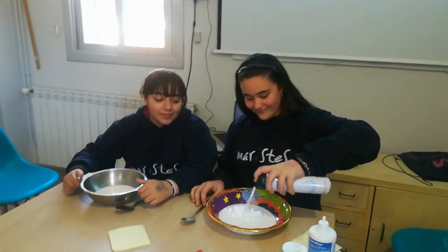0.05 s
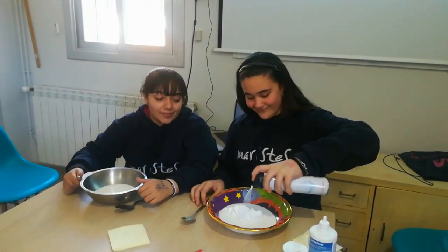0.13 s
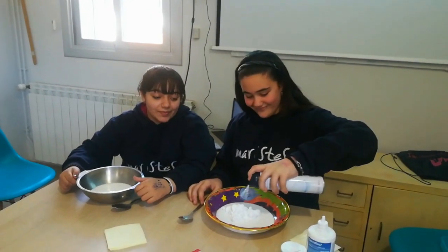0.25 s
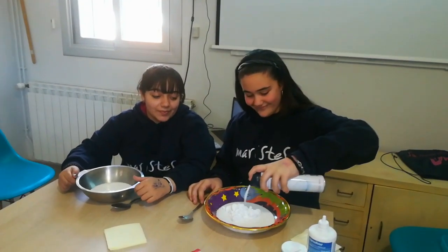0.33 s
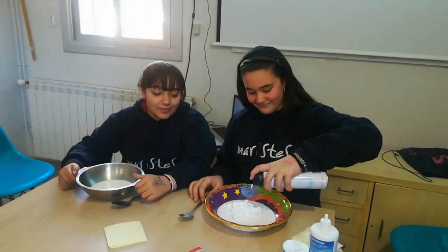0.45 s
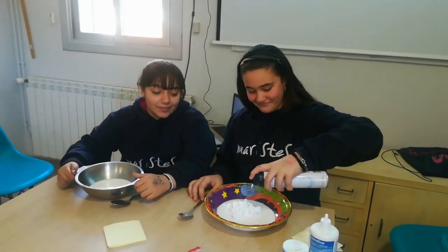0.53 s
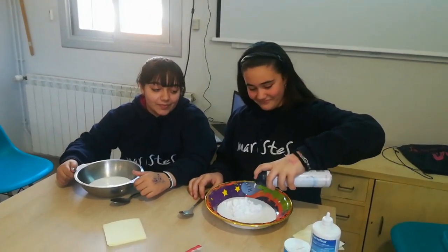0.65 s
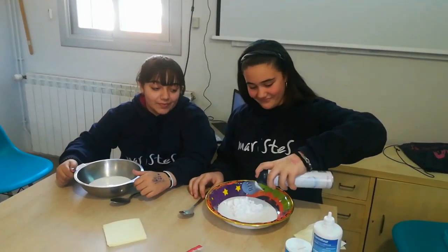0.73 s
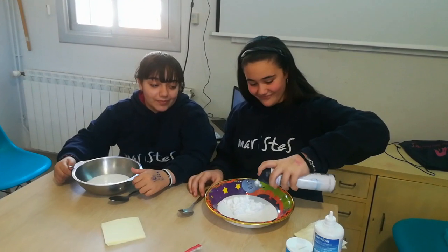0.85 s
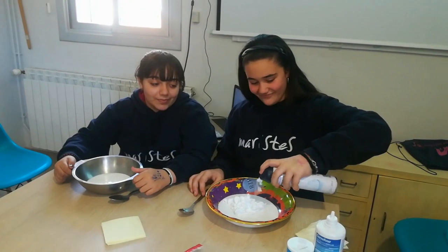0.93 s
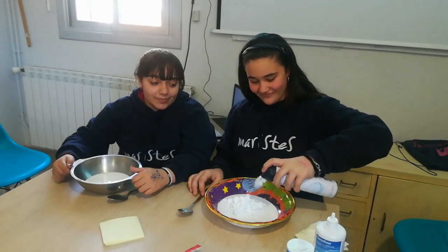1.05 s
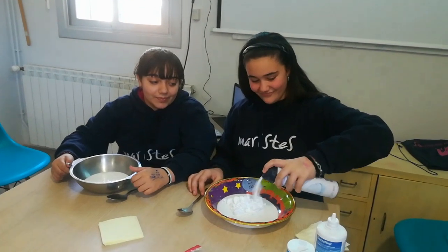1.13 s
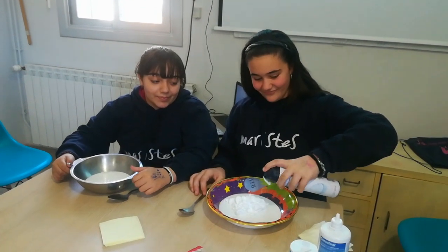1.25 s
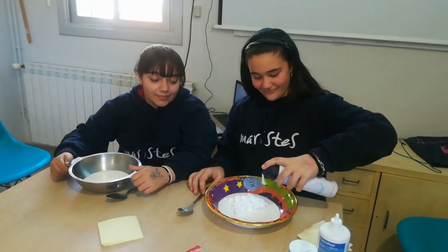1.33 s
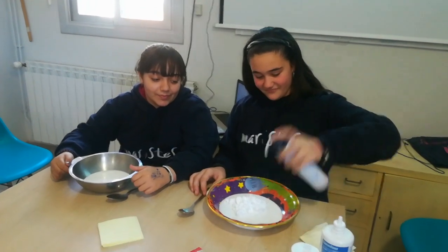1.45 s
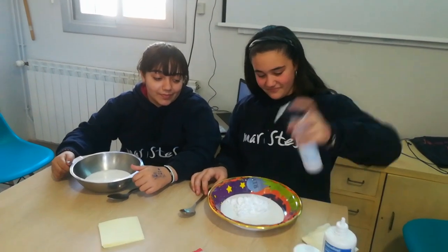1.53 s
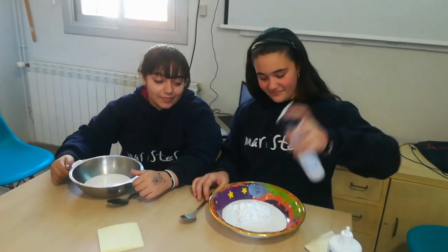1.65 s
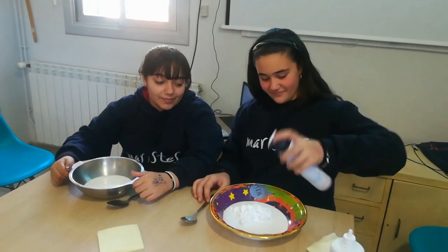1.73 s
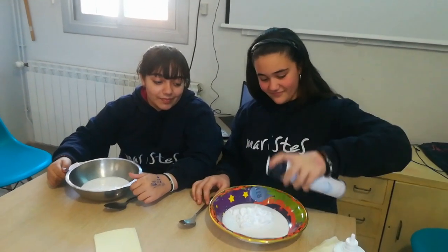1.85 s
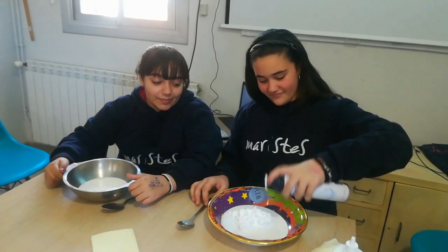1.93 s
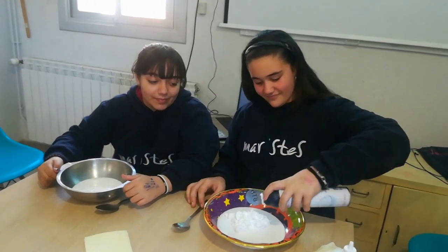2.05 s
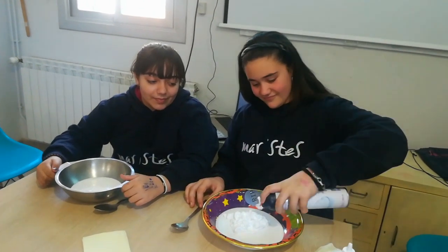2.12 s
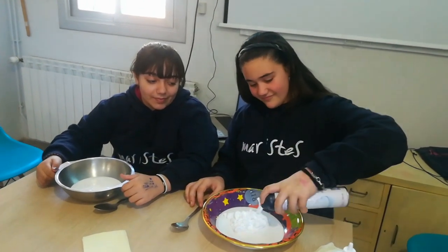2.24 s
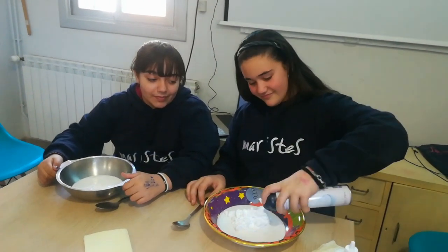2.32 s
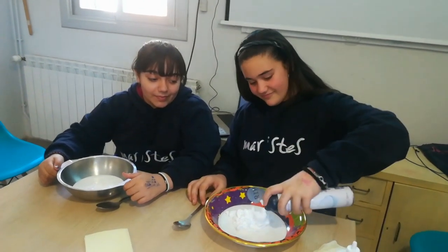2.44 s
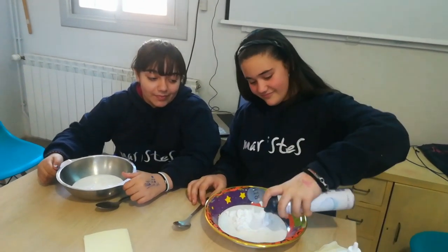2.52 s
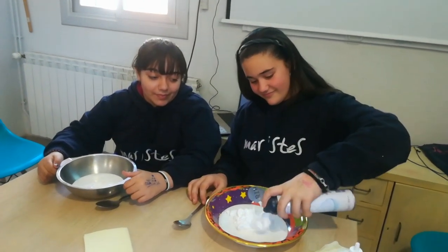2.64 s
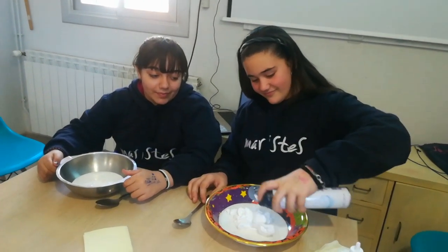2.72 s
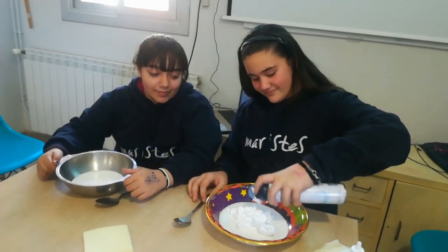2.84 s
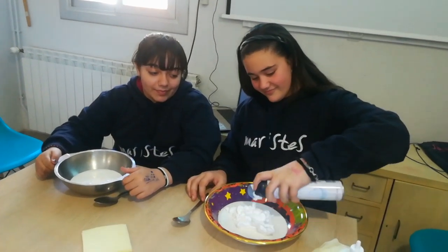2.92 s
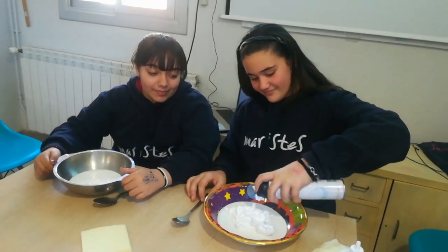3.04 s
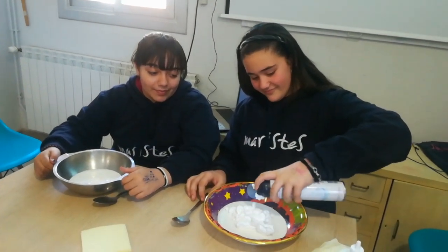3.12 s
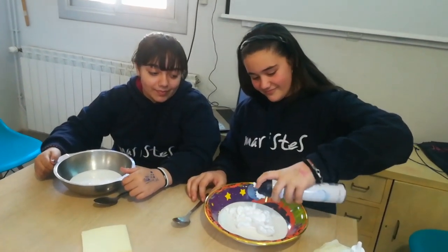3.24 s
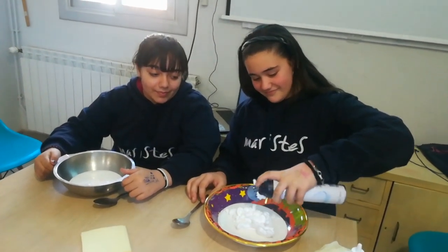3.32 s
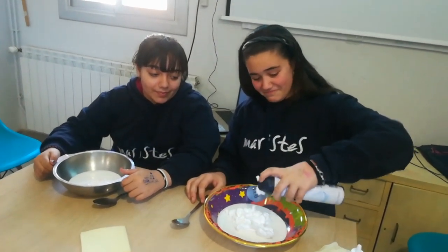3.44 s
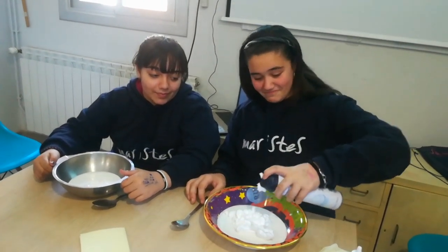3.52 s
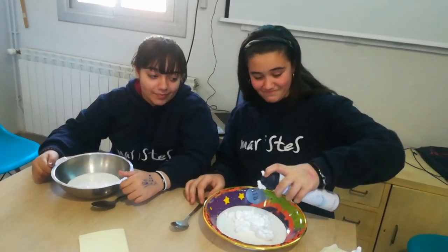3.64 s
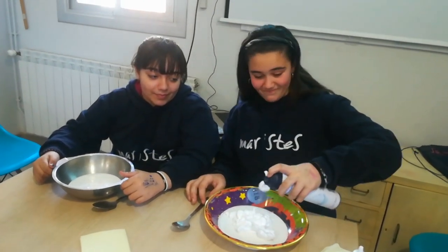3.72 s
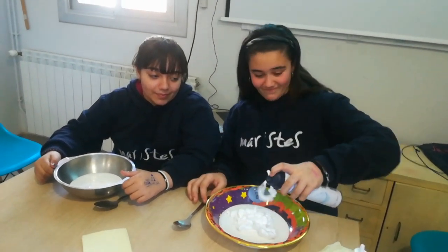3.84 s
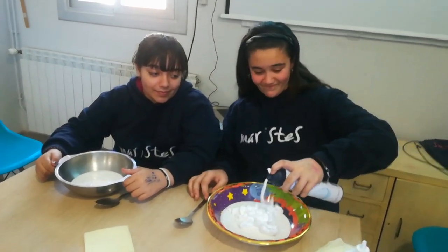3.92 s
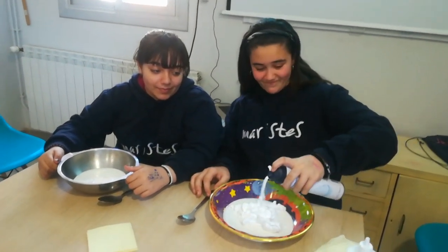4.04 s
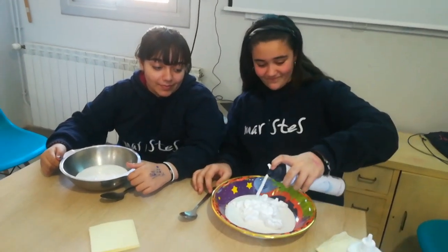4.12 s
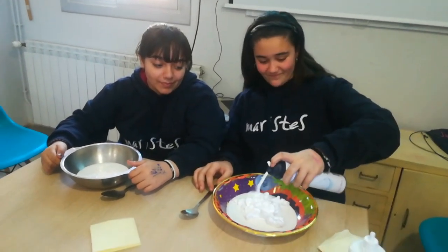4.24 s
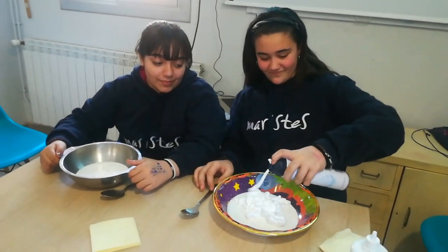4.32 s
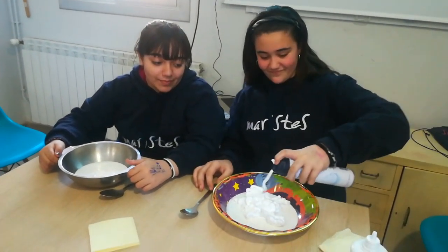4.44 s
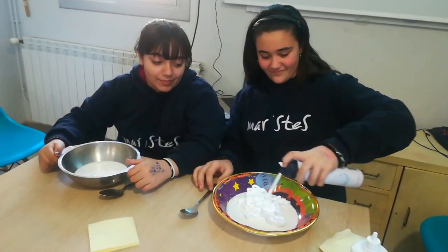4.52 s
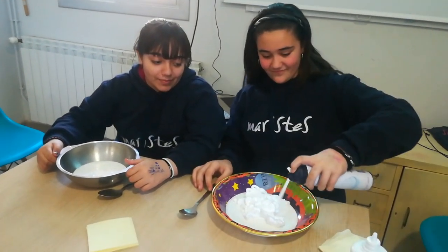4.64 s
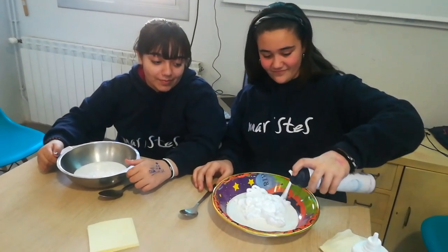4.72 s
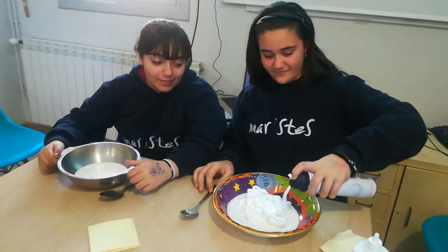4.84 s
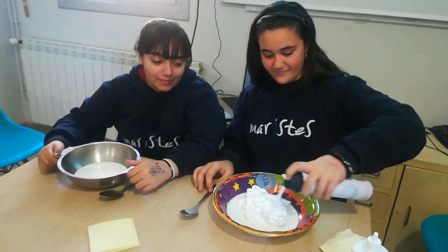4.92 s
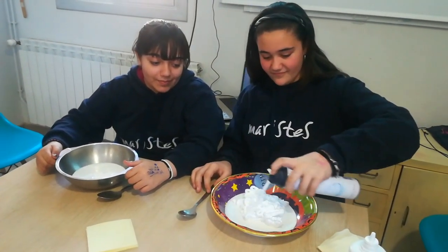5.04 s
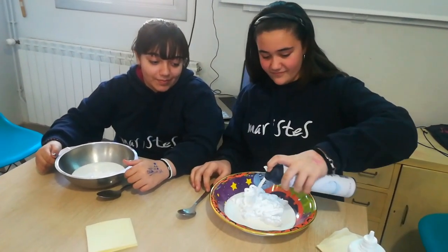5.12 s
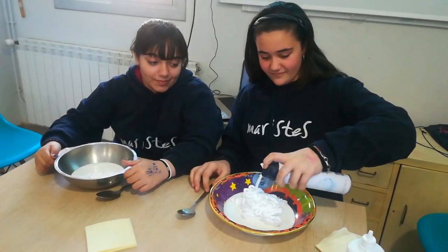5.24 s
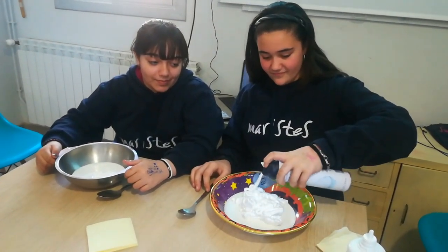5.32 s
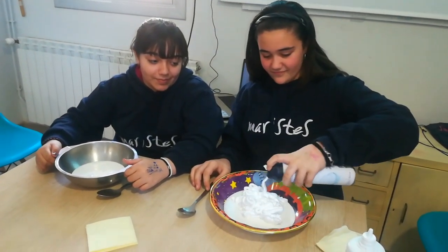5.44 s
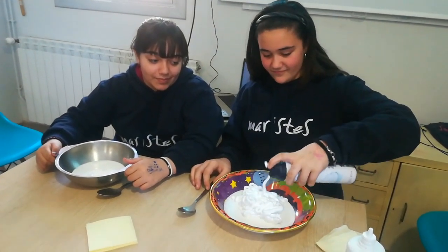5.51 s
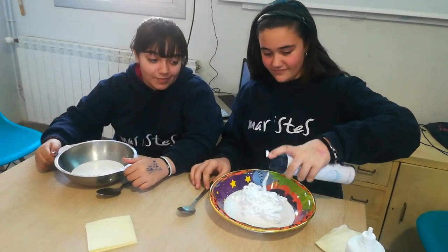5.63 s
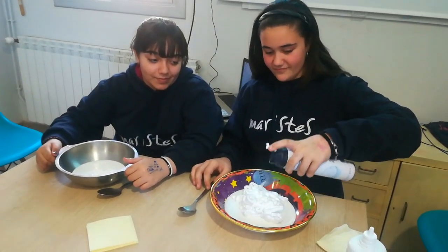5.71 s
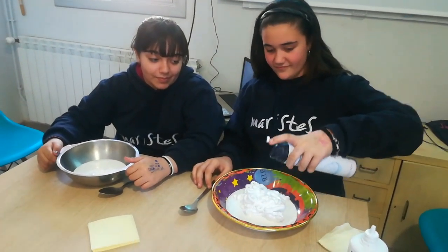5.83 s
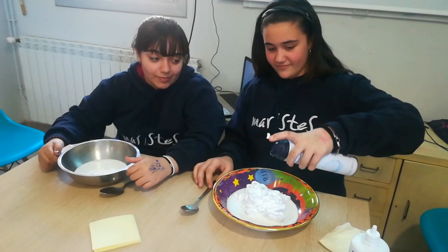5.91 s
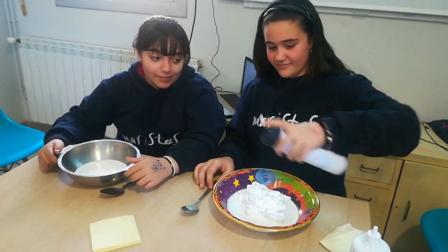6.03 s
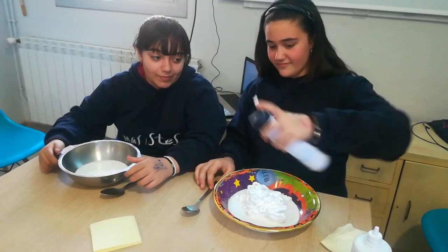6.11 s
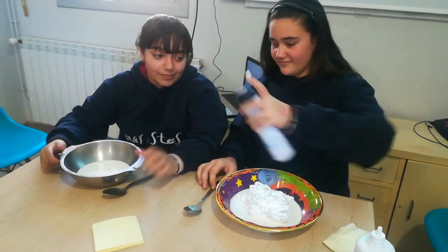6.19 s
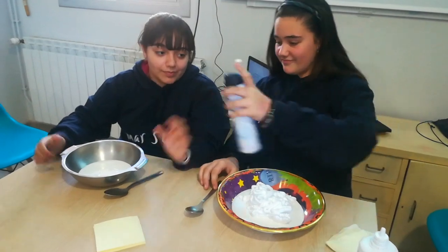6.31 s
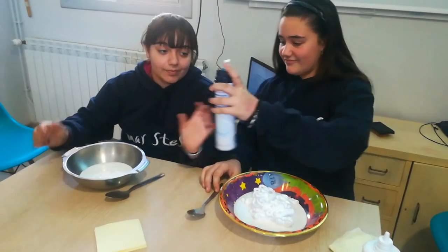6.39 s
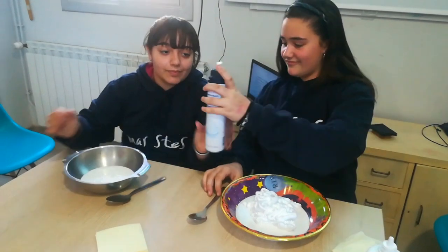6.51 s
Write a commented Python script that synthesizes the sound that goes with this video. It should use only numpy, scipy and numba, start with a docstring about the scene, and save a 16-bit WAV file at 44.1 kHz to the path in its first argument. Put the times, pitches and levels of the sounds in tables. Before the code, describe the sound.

Short spurts of foam hiss and sputter from a spray can in a classroom, followed by a door banging shut.

```python
"""An aerosol can squirts foam onto a plate in short spurts, about a metre away in a hard-walled classroom.
Gas hisses through the nozzle, bubbles burst in the jet and the valve spits; between spurts it only seeps.
A small fan whines and sleeves rustle. Further off, a door knocks and bangs shut."""
import sys
import numpy as np
from scipy import signal
from scipy.fft import rfft, irfft
from scipy.io import wavfile
from scipy.ndimage import uniform_filter1d
from numba import njit

SR = 44100
rng = np.random.default_rng(int(sys.argv[2]) if len(sys.argv) > 2 else 0)


def master_out(mix):
    """Clip the mix to full scale and print it as 16-bit PCM to the path in sys.argv[1]."""
    frames = np.transpose(np.atleast_2d(mix))
    ceiling = np.clip(frames, -1, 1)
    pcm = np.round(ceiling * 32767).astype(np.int16)
    wavfile.write(sys.argv[1], SR, pcm)


N = 289281
TIME = np.arange(N) / SR

# The tone of gas leaving the nozzle: pitch_hz, level_db
JET_TONE = [(500, -27.5), (1000, -15), (1290, -11), (1450, -14.5), (1850, -3), (2350, -7), (3150, 0),
            (4300, -1.5), (5400, -0.5), (6650, 0), (8000, -7), (9100, -10.5), (12000, -17), (15800, -21.5)]


def amp(db):
    """Turn decibels into a number to multiply by."""
    return 10 ** (np.asarray(db) / 20)


def unit(x):
    """Scale a signal to an average power of 1."""
    return x / np.sqrt(np.mean(x ** 2))


def noise():
    """White noise as long as the scene."""
    return rng.standard_normal(N)


def wander(per_s):
    """A smooth random wobble, about 1 in size."""
    step = int(SR / per_s)
    stairs = np.repeat(noise()[:N // step + 1], step)
    return unit(uniform_filter1d(stairs, step)[:N])


def gate(start, stop, rise_s, fall_s):
    """A level that rises at the start and dies away after the stop."""
    return np.clip((TIME - start) / rise_s, 0, 1) * np.exp(-np.maximum(TIME - stop, 0) / fall_s)


def burst(start, length):
    """A quick swell that peaks at half the length, then dies away."""
    age = np.clip(2 * (TIME - start) / length, 0, 60)
    return age * np.exp(1 - age)


def look_up(table, hz):
    """Read a table's value at any pitch, sliding between its rows."""
    pitches, values = np.transpose(table)
    return np.interp(np.log(np.maximum(hz, 1)), np.log(pitches), values)


def colour(x, tone, size=2048):
    """Filter a sound to the tone in a table; white noise keeps its power."""
    cepstrum = irfft(np.log(amp(look_up(tone, np.fft.rfftfreq(size, 1 / SR)))))
    # folding makes the filter ring only after a sound, never before it
    cepstrum[1:size // 2] *= 2
    cepstrum[size // 2 + 1:] = 0
    response = irfft(np.exp(rfft(cepstrum)))
    return signal.oaconvolve(x, response / np.linalg.norm(response))[:N]


@njit
def band_pass(x, tuning, damping):
    """Let through one band of pitches, which may move."""
    out, band, low = np.empty(len(x)), 0., 0.
    for i in range(len(x)):
        g, k = tuning[i], damping[i]
        now = (band + g * (x[i] + 1e-18 - low)) / (1 + g * (g + k))
        band, low, out[i] = 2 * now - band, low + 2 * g * now, k * now
    return out


def resonate(x, hz, width_hz):
    """Make a sound ring around one pitch; white noise keeps about its power."""
    hz = np.clip(hz, 1, SR / 3) * np.ones(len(x))
    return band_pass(x, np.tan(np.pi * hz / SR), width_hz / hz) * np.sqrt(SR / np.pi / width_hz)


def room(x, decay_scale, onset_s):
    """The classroom's echo: long waves reach both ears alike, short ones do not."""
    # Time to fade by 60 dB, before decay_scale multiplies it: pitch_hz, decay_s
    decay_times = [(100, 0.43), (500, 0.49), (2000, 0.62), (4000, 0.51), (8000, 0.38), (15000, 0.37)]
    hz, _, cells = signal.stft(rng.standard_normal((2, SR)), SR, nperseg=256)
    apart = np.pi / 4 * np.minimum(hz / 420, 1)[:, None] ** 1.5
    mid, side = np.cos(apart) * cells[0], np.sin(apart) * cells[1]
    decay_s = decay_scale * look_up(decay_times, hz)[:, None]
    fade = np.exp(-np.log(1000) * np.linspace(0, 1, cells.shape[-1]) / decay_s)
    tail = signal.istft(np.array([mid + side, mid - side]) * fade, SR)[1][:, :SR]
    tail *= 1 - np.exp(-TIME[:SR] / onset_s)
    tail /= np.linalg.norm(tail, axis=1, keepdims=True)
    return signal.fftconvolve(x[None], tail, axes=1)[:, :N]


def valve(dribble_db=-11, sag_db_per_s=21, drying_db_per_s=16, after_db=-15.5, after_db_per_s=67.5):
    """Each press swells, holds and fades to a weakening dribble; gives the curves that steer the can."""
    # Presses of the valve: press_s, shut_s, level_db, swell_s, swell_db, hold_s, fade_db_per_s,
    # splatter_db, whistle_db, top_hz, arch_octaves
    presses = [(0.0, 0.261, -27.5, 0.001, -10, 0.034, 190, -18, -12, 6000, 0.074),
               (0.266, 0.426, -27, 0.065, 0.5, 0.059, 265, -19, -5, 6230, 0.23),
               (0.731, 1.167, -26.5, 0.098, 6.5, 0.057, 49.5, -19, 0, 6280, 0.03),
               (2.591, 3.112, -28.5, 0.013, 2, 0.46, 80.5, -12.5, -4, 6400, 0.89),
               (3.62, 3.648, -52.5, 0.003, 1, 0.02, 55.5, -22, 4, 3440, 0.058),
               (3.644, 4.08, -28.5, 0.061, 11, 0.025, 297.5, -17.5, 0, 4820, 0.055)]
    clearest = 0.66  # how far through a spurt the nozzle is least clogged
    choke_db, choke_octaves = -7.5, 0.88  # in a dribble, foam damps and lowers the whistle
    flow, dribble, after_hiss = np.zeros((3, N))
    tone = np.zeros((3, N))
    for press, shut, db, swell, swell_db, hold, fade, splatter_db, whistle_db, top_hz, arch in presses:
        age = np.clip(TIME - press, 0, shut - press)
        eased_s = np.maximum(age - swell - hold, 0)
        fall_db = np.maximum(-fade * eased_s, dribble_db - sag_db_per_s * eased_s)
        strength = amp(db - swell_db * np.maximum(1 - age / swell, 0) + fall_db)
        choked = np.minimum(fall_db / dribble_db, 1) ** 2
        jet = strength * gate(press, shut, rise_s=0.00067, fall_s=0.01)
        flow += jet
        dribble += jet * choked
        shut_for_s = np.maximum(TIME - shut, 0)
        after_hiss += strength * (TIME > shut) * amp(after_db - after_db_per_s * shut_for_s)
        # the whistle rises as the nozzle clears and sinks as foam fills it
        clogged = np.cos(np.pi / 2 * age / (shut - press) / clearest) ** 2
        hz = top_hz * 2 ** (-arch * clogged - choke_octaves * choked)
        # weak flow is wetter; a spurt dries as it runs
        wet_db = splatter_db - 0.7828 * fall_db - drying_db_per_s * age
        tone = np.where(TIME >= press, [wet_db, whistle_db + choke_db * choked, hz], tone)
    return flow, dribble, after_hiss, *tone


def bubbles(per_s, spread_db, pop_s):
    """Bubbles of uneven size burst at random, each with a tiny puff of gas."""
    sizes = amp(spread_db * np.minimum(rng.exponential(size=N), 4))
    pops = (rng.random(N) < per_s / SR) * sizes
    fading_power = signal.lfilter([1], [1, -np.exp(-2 / (pop_s * SR))], pops ** 2)
    return unit(noise() * np.sqrt(fading_power))


def spray(flow, wet_db, whistle_db, nozzle_hz, flutter_db=0.78):
    """Gas and bursting bubbles rush from the whistling nozzle; wet foam patters on the plate."""
    # The tone of foam landing: pitch_hz, level_db
    splatter_tone = [(60, -11), (140, -9.5), (250, -2), (480, -4.5), (720, 3), (1100, -5), (1450, -5),
                     (2500, -18)]
    flow = flow * amp(1 + flutter_db * wander(90))
    jet = colour(amp(-3) * noise() + amp(-5) * bubbles(per_s=500, spread_db=0.5, pop_s=0.0021), JET_TONE)
    splatter = amp(wet_db - 1) * colour(bubbles(per_s=600, spread_db=-0.5, pop_s=0.0015), splatter_tone)
    share = amp(whistle_db - 1)  # the whistle takes its share of the jet's power
    whistling_jet = (jet + share * whistle(nozzle_hz)) / np.sqrt(1 + share ** 2)
    return flow * (whistling_jet + splatter)


def whistle(hz, waver=0.026):
    """Bursting bubbles keep the nozzle ringing on an unsteady note."""
    hz = hz * (1 + waver * wander(50))
    ring = resonate(bubbles(per_s=1900, spread_db=6.5, pop_s=0.0012), hz, width_hz=480)
    return unit(resonate(ring, hz, width_hz=8200))


def spits(dribble, spit_s=0.0018, sputter_per_s=45, sputter_hz=3810):
    """Each gas pocket gives a puff that rings the nozzle; small ones come at random in a dribble."""
    # The loudest gas pockets: start_s, level_db, pitch_hz
    big_pockets = [(0.043, -30, 5600), (0.095, -23.5, 5860), (0.175, -23, 4840), (0.244, -24.5, 4800),
                   (0.248, -17, 5000), (0.253, -21, 5020), (0.998, -24, 3230), (1.093, -26, 4730),
                   (1.117, -22.5, 6160), (1.148, -27.5, 3300), (2.213, -47, 5100), (3.093, -26.5, 4830),
                   (3.651, -34.5, 4540), (3.749, -20, 3200), (3.771, -22.5, 2830), (3.813, -25, 3300),
                   (3.848, -25.5, 2730), (4.238, -43.5, 4000)]
    small_pockets = (rng.random(N) < sputter_per_s / SR) * dribble * amp(3)
    sputter = signal.oaconvolve(small_pockets, burst(0, spit_s)[:SR // 10])[:N]
    big_spits = [(amp(db) * burst(start, spit_s), hz) for start, db, hz in big_pockets]
    puffs, rings = 0, 0
    for swell, hz in [(sputter, sputter_hz)] + big_spits:
        puff = swell * np.sign(noise())
        puffs += puff
        rings += resonate(puff, hz, width_hz=490)
    return colour(amp(-2) * puffs + amp(-11) * rings, JET_TONE)


def seep(after_hiss):
    """A thin hiss and the fizz of swelling foam, after each spurt and from a barely open valve."""
    # Slow leaks: start_s, stop_s, swell_s, hiss_db, fizz_peak_s, fizz_spread_s, fizz_db
    leaks = [(2.149, 2.584, 0.16, -49.5, 2.395, 0.068, -47.5),
             (4.007, 5.437, 0.061, -57.5, 4.25, 0.18, -56.5)]
    # The tone of leaking gas: pitch_hz, level_db
    hiss_tone = [(400, -10.5), (1400, -11), (3000, -12.5), (4300, -6.5), (6800, -2.5), (7900, -8),
                 (8700, -12.5), (12000, -19), (15800, -25.5)]
    # The tone of fizzing foam: pitch_hz, level_db
    fizz_tone = [(240, -5), (500, -12), (750, 4.5), (1350, -16.5), (1900, 1.5), (3300, 3), (5000, -0.5),
                 (9000, -24.5)]
    gas, foam = after_hiss, amp(-4) * after_hiss
    for start, stop, swell, hiss_db, peak, spread, fizz_db in leaks:
        leak = gate(start, stop, swell, fall_s=0.056)
        gas = gas + leak * amp(hiss_db)
        foam = foam + leak * amp(fizz_db) / (1 + ((TIME - peak) / spread) ** 2)
    hiss = amp(-1 + wander(35)) * colour(noise(), hiss_tone)
    fizz = amp(-3) * colour(bubbles(per_s=900, spread_db=2.5, pop_s=0.0008), fizz_tone)
    return gas * hiss + foam * fizz


def can():
    """The valve drives the spray, the spits and the seeping."""
    flow, dribble, after_hiss, wet_db, whistle_db, nozzle_hz = valve()
    return spray(flow, wet_db, whistle_db, nozzle_hz) + spits(dribble) + seep(after_hiss)


def at_the_table(x, bounces=6, drift=0.0725):
    """Sound comes straight, louder on the left, then off the plate and table, then off the walls."""
    bounced = np.zeros((2, N))
    for ear in bounced:
        for delay_s in rng.uniform(0.0003, 0.004, bounces):
            moving_delay_s = delay_s * (1 + drift * wander(5))  # the hand moves
            ear += np.interp(TIME - moving_delay_s, TIME, x, left=0) / np.sqrt(bounces)
    direct = np.array([np.roll(x, 2), x])
    near = amp([[-1], [-4.5]]) * direct + amp([[-0.2], [-3.2]]) * bounced
    # as the can moves, its sound reaches the walls along changing paths
    turn = 2 * np.pi * TIME + wander(6)
    echo = sum(room(x * aim, decay_scale=0.73, onset_s=0.0013) for aim in (np.cos(turn), np.sin(turn)))
    return near + amp([[-2], [-4]]) * echo


def background(air_db=-62):
    """The building rumbles, alike in both ears, under airy hiss, a motor's hum and a fan's whine."""
    # The tone of the rumble and hiss: pitch_hz, level_db
    air_tone = [(20, 0.5), (32, -8.5), (50, -5), (70, -5), (104, -13), (250, -17), (550, -25), (900, -22),
                (2000, -28.5), (4000, -31.5), (7500, -35.5), (10000, -43), (15800, -45)]
    # The wavering notes of the motor and fan: pitch_hz, level_db, waver_hz
    notes = [(45.04, -65, 1.9), (937, -80, 3.2), (1153, -76.5, 2.5), (1840, -85, 1.9)]
    mid, side = (amp(air_db) * colour(noise(), air_tone, size=8192) for _ in range(2))
    side = amp(-2) * signal.sosfilt(signal.butter(1, 450, "high", fs=SR, output="sos"), side)
    hum = 0
    for hz, db, waver_hz in notes:
        level = amp(db + wander(13))
        phase = 2 * np.pi * np.cumsum(hz + waver_hz * wander(25)) / SR
        hum += level * unit(np.sin(phase))
    return mid + hum + np.array([side, -side])


def rustles():
    """Cloth and skin brush softly, catching quickly and sliding out, with an echo from the room."""
    # Moves of sleeves and hands: start_s, length_s, level_db, pitch_hz
    brushes = [(1.417, 0.16, -57, 7200), (5.193, 0.24, -53.5, 7050), (5.706, 0.071, -45, 7160),
               (5.954, 0.04, -47, 6820), (6.13, 0.076, -61.5, 256), (6.27, 0.1, -58, 1450),
               (6.278, 0.078, -64.5, 251), (6.474, 0.046, -58.5, 7000), (6.527, 0.022, -46.5, 7000)]
    cloth = 0
    for start, length, db, hz in brushes:
        width_hz = 0.88 * hz
        progress = np.clip((TIME - start) / length, 0, 1)
        stroke = np.minimum(progress / 0.1, 1) * np.sqrt(1 - progress)
        cloth += amp(db) * stroke * unit(resonate(resonate(noise(), hz, width_hz), hz, width_hz))
    cloth = signal.sosfilt(signal.butter(3, 9000, fs=SR, output="sos"), cloth)
    near = amp(-3) * room(cloth, decay_scale=0.051, onset_s=0.0014)
    return near + amp(-4) * room(cloth, decay_scale=1, onset_s=0.0047)


def door(hinge_hz=285, shudder_db=-12):
    """At each blow the panel booms and the latch and frame rattle; the hinge groans as it swings."""
    # Blows on the door: start_s, thud_db, rattle_db, contact_s
    blows = [(4.779, -47, -42.5, 0.03), (5.138, -55, -51.5, 0.051), (5.496, -34.5, -36, 0.012),
             (5.51, -21, -18.5, 0.0097), (5.524, -25.5, -19.5, 0.0052), (5.542, -23.5, -28.5, 0.021)]
    # The panel's own notes, each fading by 60 dB: pitch_hz, level_db, decay_s
    panel_notes = [(109.4, -14.5, 0.84), (160.5, 1, 0.37), (205, -12.5, 0.18), (291, -4.5, 0.31),
                   (301, 5.5, 0.18), (334, 5, 0.24), (350.8, 4, 0.26), (374.3, 2, 0.41), (400, -13.5, 0.48),
                   (730, -12, 0.17)]
    # The tone of the latch and frame: pitch_hz, level_db
    rattle_tone = [(30, 6), (85, -10), (330, 7.5), (500, -6), (750, 1), (1250, -2.5), (1800, -7),
                   (2500, -10), (3400, 0), (4700, -4), (5400, -7.5), (6700, -6), (8200, -21.5),
                   (15800, -30.5)]
    # How the hinge's groan grows: time_s, level_db
    groan_levels = [(5.35, -68), (5.41, -56.5), (5.5, -50.5)]
    t = TIME[:SR]
    panel = sum(amp(db) * np.cos(2 * np.pi * hz * t) * np.exp(-np.log(1000) * t / decay_s)
                for hz, db, decay_s in panel_notes)
    push, knock = 0, 0
    for start, thud_db, rattle_db, contact_s in blows:
        shudder = amp(shudder_db) * gate(start, start + contact_s, contact_s, fall_s=0.08)
        force = burst(start, contact_s) + shudder
        top_hz = 11300 * (0.012 / contact_s) ** 1.75  # longer contacts sound duller
        soften = signal.butter(2, min(top_hz, SR / 3), fs=SR, output="sos")
        push += amp(thud_db) * force * noise()
        knock += amp(rattle_db) * force * signal.sosfilt(soften, noise())
    boom = signal.fftconvolve(push, panel / np.linalg.norm(panel))[:N]
    rattle = colour(knock, rattle_tone)
    swing_s, groan_db = np.transpose(groan_levels)
    swing = gate(swing_s[0], swing_s[-1], rise_s=0.016, fall_s=0.02)
    swing *= amp(np.interp(TIME, swing_s, groan_db))
    groan = swing * unit(resonate(resonate(noise(), hinge_hz, width_hz=62), hinge_hz, width_hz=120))
    echo = amp(-9) * room(boom, decay_scale=0.46, onset_s=0.0059)
    echo += amp(-3) * room(rattle, decay_scale=0.93, onset_s=0.00089)
    near = amp(-0.5) * room(rattle, decay_scale=0.019, onset_s=0.0017)
    return amp(-3) * boom + groan + amp([[1.2], [-1.2]]) * (echo + near)


def scene():
    """Add up the rustles, the can at the table, the door and the background."""
    return rustles() + at_the_table(can()) + door() + background()


def record(dry, top_hz=15850):
    """Cut off the very highest treble."""
    return signal.sosfilt(signal.ellip(10, 0.2, 70, top_hz, fs=SR, output="sos"), dry)


dry = scene()
out = record(dry)
master_out(out)
```